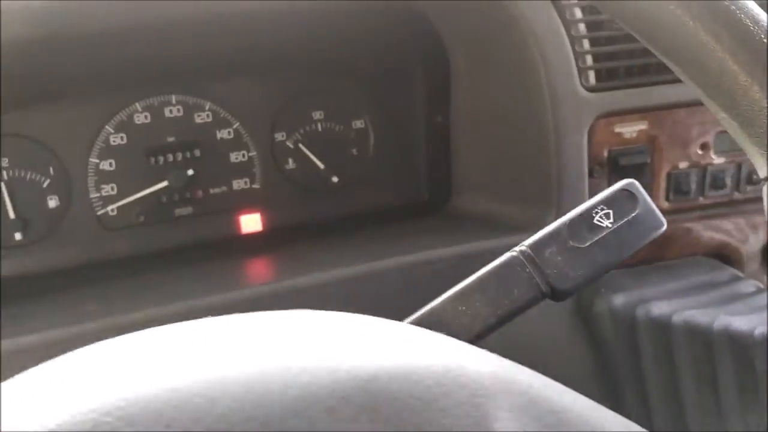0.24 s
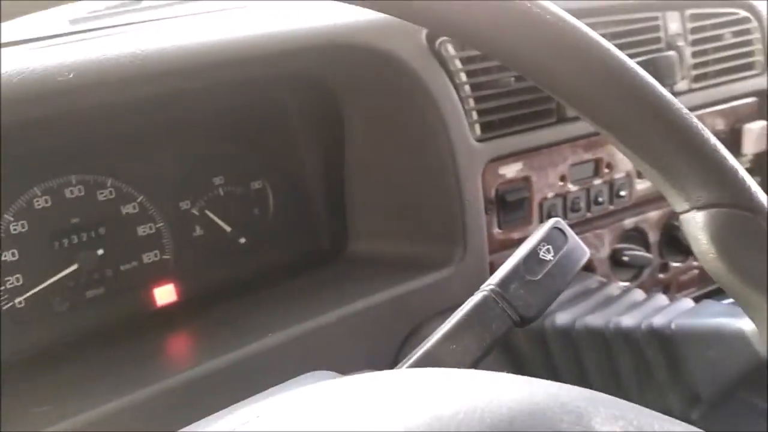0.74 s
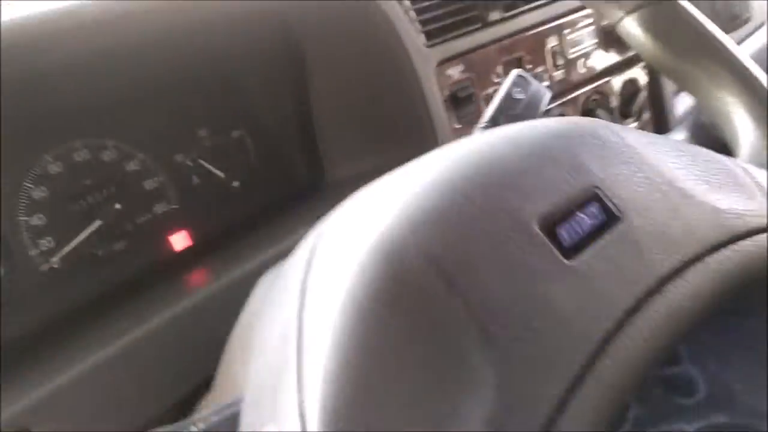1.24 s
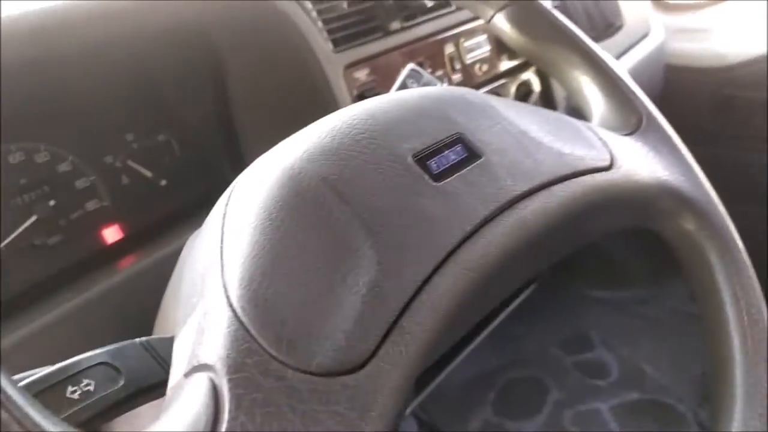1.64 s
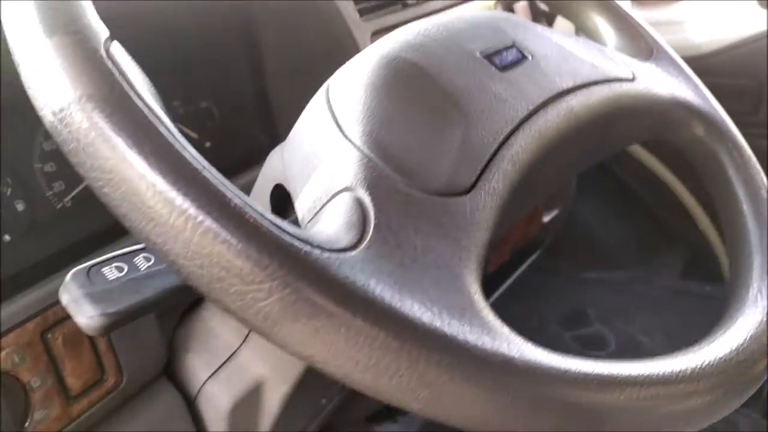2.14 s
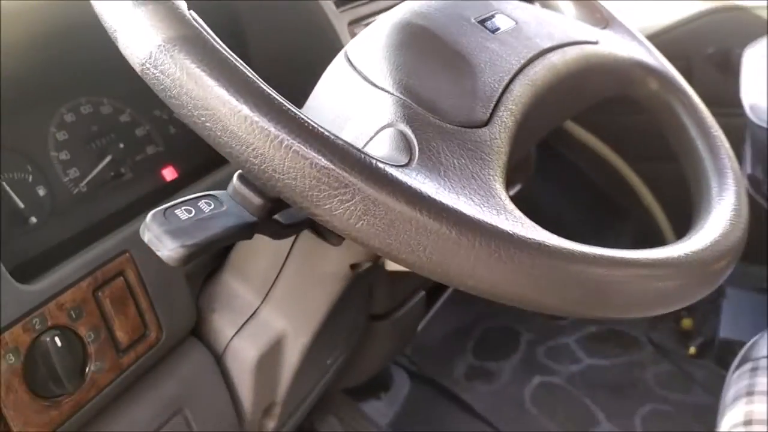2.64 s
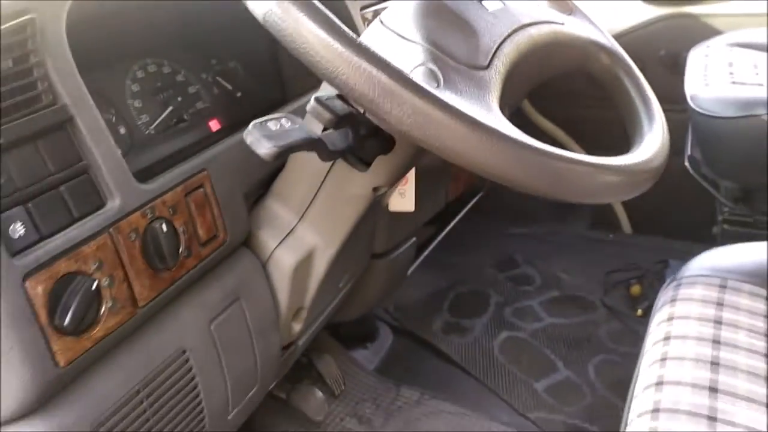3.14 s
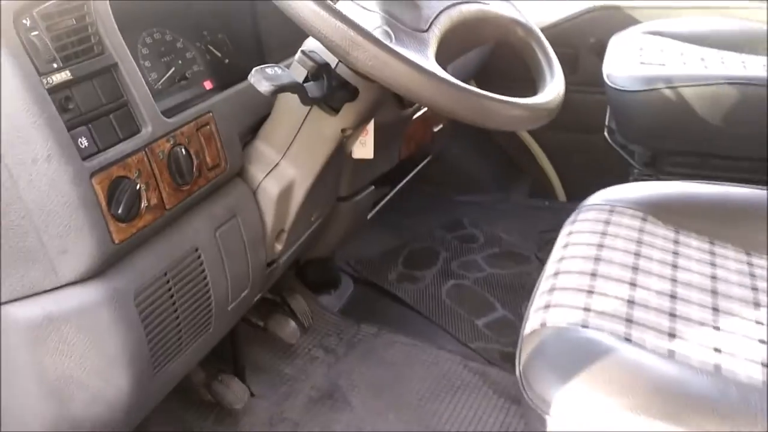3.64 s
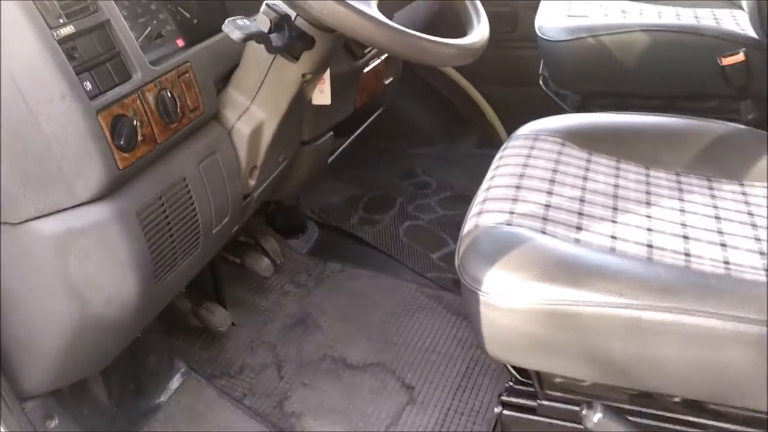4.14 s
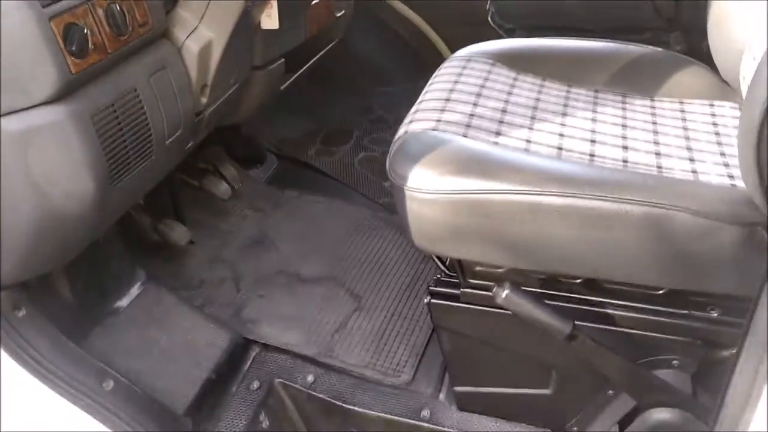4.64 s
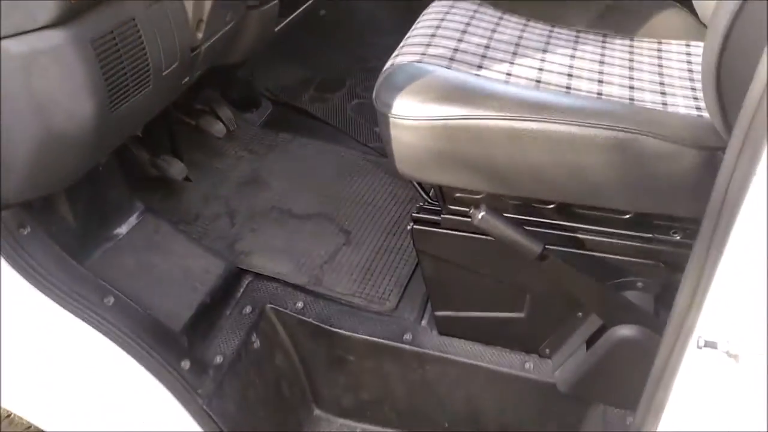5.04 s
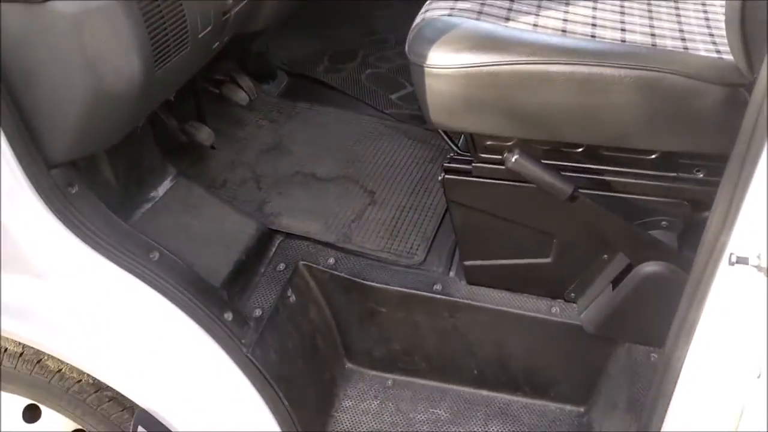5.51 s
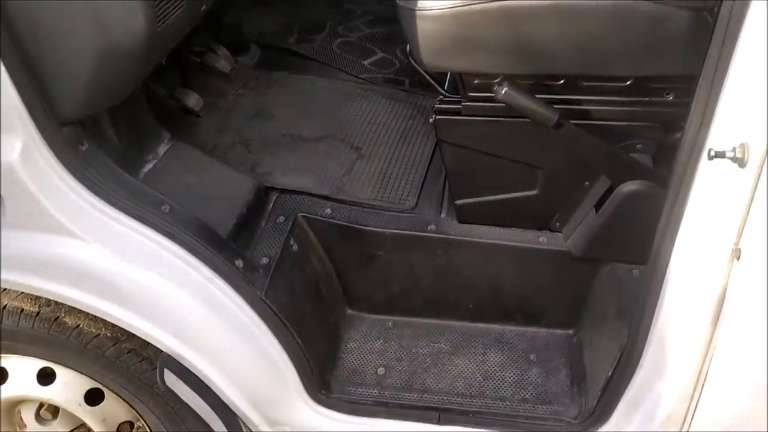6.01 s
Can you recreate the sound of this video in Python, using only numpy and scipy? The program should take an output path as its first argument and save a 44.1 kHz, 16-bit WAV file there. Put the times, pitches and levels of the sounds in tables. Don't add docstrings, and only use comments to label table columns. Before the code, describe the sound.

Low, clattery diesel idle heard from inside a cab towards the open door, with an early snap, soft bumps, a latch knock and rustling.

```python
import sys
import numpy as np
from scipy import signal
from scipy.fft import rfft, irfft, next_fast_len
from scipy.io import wavfile
from scipy.ndimage import uniform_filter1d, map_coordinates

SR = 44100
rng = np.random.default_rng(int(sys.argv[2]) if len(sys.argv) > 2 else 0)


def store_wav(level_fs):
    pcm = np.round(np.clip(np.atleast_2d(level_fs), -1, 1) * 32767)
    wavfile.write(sys.argv[1], SR, pcm.T.astype(np.int16))


def linear_from_db(decibels):
    return 10 ** (np.asarray(decibels, float) / 20)


N = 276507

# start_s [s], turned [engine cycles]
CRANK_TURNS = [(-.052, 0), (1.911, 11), (2.267, 13), (3.339, 19), (4.049, 23), (4.764, 27), (6.3716, 36)]


def unit(x):
    return x / np.sqrt(np.mean(x ** 2) + 1e-20)


def along(points, hz):
    f, v = np.transpose(points)
    return np.interp(np.log(hz + 1), np.log(f + 1), v)


def curves(rows):
    s, *cols = np.transpose(rows)
    return [np.interp(np.arange(N) / SR, s, c) for c in cols]


def wobble(rate):
    knots = rng.standard_normal(int(N * rate / SR) + 4)
    return map_coordinates(knots, [np.arange(N) * rate / SR])


def filtered(x, response):
    m = next_fast_len(N + SR // 2)
    return irfft(rfft(x, m) * response(np.fft.rfftfreq(m, 1 / SR)), m)[..., :N]


def colored(x, points):
    return unit(filtered(x, lambda f: linear_from_db(along(points, f))))


def resonant(peaks):
    def response(f):
        total = 0
        for k, (hz, width, db) in enumerate(peaks):
            damping = 1j * f * width
            total = total + (-1) ** k * linear_from_db(db) * damping / (hz * hz - f * f + damping)
        return total
    return response


def heard(levels):
    # start_s [s], place [0 dash, 1 footwell, 2 sill, 3 outside]
    path = [(0, 0.5), (1.0, 0.08), (1.5, 0.7), (2.1, 1.33), (2.8, 1.5), (3.5, 1.77), (4.2, 1.46), (4.8, 2),
            (5.4, 2.5), (5.8, 2.5), (6.27, 6)]
    return np.interp(curves(path)[0], range(4), levels)


def patchy(depth_db):
    z = signal.stft(rng.standard_normal((2, N)), nperseg=512)[2]
    field = uniform_filter1d(rng.standard_normal(z.shape[1:]), size=5, axis=0)
    field = uniform_filter1d(field, size=5, axis=1)
    return signal.istft(z * linear_from_db(depth_db * unit(field)), nperseg=512)[1][:, :N]


def cyclic(fresh, at, cylinder):
    # pitch_hz [Hz], share [power ratio]
    returning = [(100, .75), (700, .7), (1500, .45), (3000, .15), (6000, 0)]
    last = np.clip(np.searchsorted(at, np.arange(N), side="right") - 1, 0, None)
    since = abs(np.arange(N) - at[last])
    habit = rng.standard_normal((2, 2, 4, SR // 10))[..., cylinder[last], since]
    turn = heard((0, .5, 1.1, 1.6))
    same = np.cos(turn) * habit[0] + np.sin(turn) * habit[1]

    def shares(f):
        share = along(returning, f)
        return np.sqrt(np.array([share, 1 - share]))[:, None]
    return filtered(np.array([same, unit(fresh)]), shares).sum(axis=0)


def boom(cycles):
    even_leads = [(2, 3.6), (3, 1.5), (4, 1.2)]
    even_levels = [(-49.5, -44.5, -51, -51), (-47, -41.5, -53, -51), (-63, -58.5, -51.5, -51.5)]
    # cycle_order [1], level_db [dB], lead [rad], dash_gain_db [dB]
    uneven = [(7, -62, 2.1, 5), (9, -66, -2, 8), (10, -66, -1.8, 10), (11, -70, -1.2, 3), (13, -70, -2, 4),
              (15, -71, -1.8, 5), (17, -72, 1.4, 0), (20, -66, .2, 0), (25, -66, -2, -5)]
    angle, by_dash = 2 * np.pi * cycles, heard((1, 0, 0, 0))
    total = np.zeros(N)
    for levels, (k, lead) in zip(even_levels, even_leads):
        total += linear_from_db(heard(levels) + .8 * wobble(6)) * np.cos(4 * k * angle + lead)
    for k, db, lead, gain_db in uneven:
        total += linear_from_db(db + gain_db * by_dash + 1.9 * wobble(3.0)) * np.cos(k * angle + lead)
    x = np.sqrt(2) * total
    return np.array([x, x * .35])


def block_clatter(fire, burn, at, cylinder):
    # pitch_hz [Hz], width_hz [Hz], level_db [dB]
    block = [(766, 90, -6), (1010, 190, -4.5), (1550, 490, -2.5), (2080, 660, -6.5), (2710, 650, -10.5),
             (4800, 320, -24)]
    level_db = (-71, -59, -56.5, -57.5)
    roar = (unit(burn) + .12) * cyclic(rng.standard_normal((2, N)), at, cylinder)
    blows = .25 * unit(fire) * [[1], [.3]]
    return linear_from_db(heard(level_db) + 1.0) * unit(filtered(roar + blows, resonant(block)))


def sump_ring(blow, cycles):
    # pitch_hz [Hz], width_hz [Hz], level_db [dB]
    inner_rings = [(750, 55, 0), (650, 55, 0)]
    # pitch_hz [Hz], width_hz [Hz], level_db [dB]
    outer_rings = [(692, 52, 0), (1010, 110, -5), (1550, 150, -7), (2000, 150, -6)]
    level_db = (-71.5, -66, -63, -56.5)
    first = (cycles % 1 > .96) | (cycles % 1 < .2)
    each = lambda f: np.array([resonant([ring])(f) ** 2 for ring in inner_rings])
    inner = unit(filtered(blow * [first, ~first], each).sum(axis=0))
    outer = unit(filtered(np.roll(blow, 40), lambda f: resonant(outer_rings)(f) ** 2))
    outside = np.clip(heard((0.05, .3, .75, .8)), 0, 1)
    ring = np.sqrt(1 - outside) * inner + np.sqrt(outside) * outer
    return linear_from_db(heard(level_db) + 2.5) * ring * [[1], [.4]]


def panel_thump(push):
    # pitch_hz [Hz], width_hz [Hz], level_db [dB]
    panels = [(133.5, 22, -4.5), (198, 34, -1.5), (238, 36, -.6), (310.6, 31.5, -6)]
    level_db = (-60, -57.5, -59.5, -60)
    spread = lambda f: np.exp(-1j * np.pi * .00025 * (f - 228) ** 2)
    thump = unit(filtered(push, lambda f: resonant(panels)(f) ** 2 * spread(f)))
    return linear_from_db(heard(level_db)) * thump * [[1], [.4]]


def valve_gear(seating):
    # pitch_hz [Hz], width_hz [Hz], level_db [dB]
    gear = [(3530, 500, 0.5), (4460, 550, 3.5)]
    level_db = (-91, -98, -60, -63)
    t = np.arange(SR // 10) / SR
    dying = signal.fftconvolve(seating, linear_from_db(-60 * t / 0.11))[:N]
    chatter = dying * rng.standard_normal((2, N))
    return linear_from_db(heard(level_db)) * unit(filtered(chatter, resonant(gear)))


def engine_rattle(churn, burn):
    # pitch_hz [Hz], level_db [dB per Hz]
    rattle_color = [(180, -14), (300, -9), (425, -11), (633, -2.5), (825, -7), (1520, -8), (2310, -14.5),
                    (11200, -27.5), (14800, -32), (15800, -48)]
    level_db = (-63.5, -65.5, -60.5, -61.5)
    return linear_from_db(heard(level_db) + 9.0) * colored((1 + 0.58 * unit(burn)) * churn, rattle_color)


def engine_rumble(churn):
    # pitch_hz [Hz], level_db [dB per Hz]
    rumble_color = [(20, -32), (40, -8), (80, -5.5), (125, 0), (200, -8.5), (300, -6.5), (380, -27),
                    (900, -48.5)]
    level_db = (-50.5, -59.5, -54.5, -56)
    return linear_from_db(heard(level_db) - 1.5) * colored(churn, rumble_color)


def dash_hollow(churn):
    # pitch_hz [Hz], width_hz [Hz], level_db [dB]
    air = [(439, 155, .1)]
    level_db = (-69.5, -64.5, -79.5, -86)
    return linear_from_db(heard(level_db)) * unit(filtered(churn, lambda f: resonant(air)(f) ** 2))


def engine(cycles):
    # clatter_db, sump_ring_db, panel_push_db, valve_tick_db [dB]
    cylinders = [(0, 0, -11, -4), (1, -2, -9, 0), (-1, -6, 0, -1), (-3, -7, -11, -9)]
    s, turned = np.transpose(CRANK_TURNS)
    number = np.arange(2, 142)
    cylinder = number % 4
    clatter_db, sump_db, push_db, tick_db = np.array(cylinders)[cylinder].T
    chance = rng.standard_normal((len(number), 5))
    fire_s = np.interp(number / 4, turned, s) - .0025 + .00015 * chance[:, 0]
    at = (fire_s * SR).astype(int)
    slap = at + round(0.00918 * SR)

    fire, blow, push, seating = np.zeros((4, N))
    fire[at] = linear_from_db(clatter_db + .8 * chance[:, 1])
    fire[slap] = linear_from_db(clatter_db - 3 + 1.5 * chance[:, 2])
    blow[at - 40] = linear_from_db(sump_db + 1.1 * chance[:, 3])
    blow[slap - 40] = linear_from_db(sump_db - 9 + 2 * chance[:, 2])
    push_gain_db = (cylinder == 1) * heard((0, 0, 6, 8))[at]
    push[at - round(.004 * SR)] = linear_from_db(push_db + push_gain_db + 1.1 * chance[:, 4])
    seating[at] = linear_from_db(tick_db + chance[:, 3])
    seating[slap] = linear_from_db(tick_db - 1 + chance[:, 4])

    t = np.arange(SR // 10) / SR
    burn = signal.fftconvolve(fire, linear_from_db(-60 * t / .075) * (1 - np.exp(-t / .0005)))[:N]
    churn = cyclic(patchy(depth_db=3.0), at, cylinder)
    knocks = block_clatter(fire, burn, at, cylinder) + sump_ring(blow, cycles) + panel_thump(push)
    between = engine_rattle(churn, burn) + engine_rumble(churn) + dash_hollow(churn)
    return knocks + valve_gear(seating) + between


def struck(blows, body, blow_share, attack_s):
    force, t = np.zeros(N + SR), np.arange(SR // 3) / SR
    for s, db, t60 in blows:
        scrape = linear_from_db(-60 * t / abs(t60)) * (1 - np.exp(-t / attack_s)) * rng.standard_normal(len(t))
        scrape[0] = blow_share
        force[round(s * SR):][:len(t)] += linear_from_db(db + 15.5) * scrape
    return filtered(force[:N], resonant(body))


def cab(x, wet_db, scatter_db):
    # pitch_hz [Hz], t60_s [s]
    decay = [(150, 0.22), (1000, 0.11), (8000, 0.011)]
    hz, t, z = signal.stft(rng.standard_normal((2, SR // 3)), SR, nperseg=256)
    t60 = abs(along(decay, hz))[:, None]
    tail = signal.istft(z * linear_from_db(-60 * t / t60) / np.sqrt(t60), SR, nperseg=256)[1]
    wet = signal.fftconvolve(x[None], tail / np.linalg.norm(tail[0]), axes=1)[:, :N]
    return np.array([x + linear_from_db(wet_db) * wet[0], linear_from_db(scatter_db) * wet[1]])


def lever_snap():
    # start_s [s], level_db [dB], scrape_t60_s [s]
    contacts = [
        (.1762, -18, 0.035),
        (.1805, -23.5, 0.055),
        (.187, -32.5, 0.036),
        (.194, -38, 0.036),
        (.2015, -46.5, 0.12),
    ]
    # pitch_hz [Hz], width_hz [Hz], level_db [dB]
    body = [(135, 40, -1), (266, 62, 2), (374, 84, 3), (566, 90, -2), (766, 120, -3.5), (1070, 120, -5),
            (1420, 360, -7.5), (1860, 330, 0.5), (2300, 420, -4.5), (2820, 230, -5), (3510, 340, -6),
            (5400, 1800, -13.5), (8500, 330, -10.5), (10540, 930, -13.5)]
    return cab(struck(contacts, body, blow_share=5.4, attack_s=0.000094), wet_db=-2.0, scatter_db=3.4)


def latch_knock():
    # start_s [s], level_db [dB], scrape_t60_s [s]
    contacts = [
        (1.9112, -25.5, 0.034),
        (1.9135, -25.5, 0.048),
        (1.919, -32.5, 0.043),
        (1.93, -36, 0.04),
        (1.95, -42.5, 0.055),
    ]
    # pitch_hz [Hz], width_hz [Hz], level_db [dB]
    body = [(149, 34, 2), (307, 30, 3.5), (385, 15, 5), (520, 60, -4.5), (633, 80, -6.5), (910, 250, -11.5),
            (1620, 710, -10), (2220, 370, -5.5), (4700, 380, -15.5), (8250, 3200, -25)]
    return cab(struck(contacts, body, blow_share=15.4, attack_s=0.0002), wet_db=-5, scatter_db=0.5)


def bolt_thud():
    # start_s [s], level_db [dB], pitch_hz [Hz], length_s [s]
    bolt = (1.9111, -15, 470, .0046)
    s, db, hz, length = bolt
    t = np.clip(np.arange(N) / SR - s, 0, length)
    swell = np.sin(np.pi * t / length) ** 2
    return -linear_from_db(db) * np.sin(2 * np.pi * hz * t) * swell * [[1], [.45]]


def seat_bumps():
    # start_s [s], level_db [dB], scrape_t60_s [s]
    bumps = [(.178, -37, 0.19), (.303, -29, 0.042), (.32, -58, 0.12), (.36, -41.5, 0.18),
             (.40, -41.5, 0.27), (.435, -41, 0.17), (.62, -40, 0.067), (1.22, -43.5, .2),
             (1.295, -38, 0.33), (1.333, -25.5, 0.11), (1.35, -51, .1)]
    # pitch_hz [Hz], width_hz [Hz], level_db [dB]
    body = [(103, 16, 3), (152, 21, 8.5), (205, 36, 0), (270, 63, -2), (420, 157, -4), (660, 380, -12.5),
            (1800, 790, -33)]
    return cab(struck(bumps, body, blow_share=11.3, attack_s=0.0056), wet_db=-5.5, scatter_db=3.0)


def ticks():
    # start_s [s], peak_db [dB], pitch_hz [Hz], t60_s [s], left_right_db [dB]
    cracks = [(0.3035, -42, 10100, 0.096, 14), (0.365, -29.5, 8050, 0.036, 15),
              (0.7866, -39, 10100, 0.05, 7), (1.113, -41, 5910, 0.064, -4), (1.4113, -38, 8610, 0.059, 4),
              (1.4444, -45, 9800, 0.046, 2.0), (2.0403, -38, 9290, 0.11, 13), (2.844, -61, 4810, 0.05, 2.5),
              (3.7, -31.5, 4260, 0.047, -8), (3.7183, -34, 5690, 0.042, -4), (3.756, -56, 8060, 0.05, -2),
              (4.2701, -46, 6660, 0.05, 9), (4.673, -40, 4490, 0.055, 6), (4.778, -31, 3900, 0.032, 4),
              (4.953, -46, 4620, 0.045, 0), (5.7752, -38.5, 9710, 0.05, 0)]
    out, t = np.zeros((2, N + SR)), np.arange(SR // 10) / SR
    f = np.fft.rfftfreq(len(t), 1 / SR)
    bright = f / 3000 / (1 + f / 3000)
    for s, db, hz, t60, pan_db in cracks:
        peak = 1 / (1 + ((f - hz) / 3500) ** 2)
        crack = unit(irfft(rfft(rng.standard_normal(len(t))) * bright * peak))
        pan = np.array([[pan_db / 2], [-pan_db / 2]])
        out[:, round(s * SR):][:, :len(t)] += linear_from_db(db - 14.5 - 60 * t / abs(t60) + pan) * crack
    return out[:, :N]


def strokes():
    # peak_s [s], level_db [dB], rise_s [s], fall_s [s], coarse_db [dB]
    rubs = [(.022, -63, 0.027, .05, -9), (.15, -60.5, 0.062, 0.045, -17), (.304, -57.5, 0.0069, 0.02, 7.5),
            (.366, -46.5, 0.0037, 0.011, -5.5), (.482, -59.5, 0.14, 0.049, -17), (.7, -58, 0.2, 0.13, -1),
            (.81, -56, 0.092, 0.32, -5.5), (1.24, -61, 0.066, 0.041, -4), (1.35, -52, 0.098, 0.03, 1.5),
            (1.418, -54, .04, .06, -9), (1.628, -63, 0.062, .03, 1), (2.07, -47.5, 0.018, 0.026, -11),
            (2.45, -66, 0.71, 0.13, -5), (2.72, -62, 0.054, 0.032, -1), (2.85, -63.5, .012, 0.49, -6),
            (3.38, -59, 0.01, 0.025, -1), (3.73, -54, 0.11, .16, -5.5), (4.41, -59, 0.16, 0.13, -0.5),
            (4.78, -57.5, 0.065, 0.051, 2.5), (4.95, -61, .05, 0.12, 2.5), (5.27, -56.5, 0.069, 0.0078, -2),
            (5.32, -60, 0.014, 0.27, -9), (5.79, -66.5, 0.49, 0.9, 4), (6.25, -60, 0.024, 0.0098, -2)]
    slope_db, still_db = 10, -78
    s, db, rise, fall, coarse_db = np.transpose(rubs)[:, :, None]
    late = np.arange(0, N, 64) / SR - s
    swell = linear_from_db(db - slope_db * np.maximum(-late / abs(rise), late / abs(fall)))
    power = [(swell ** 2).sum(0), ((swell * linear_from_db(coarse_db)) ** 2).sum(0)]
    return np.sqrt(np.repeat(power, 64, axis=1)[:, :N] + linear_from_db(still_db) ** 2)


def rustle():
    # pitch_hz [Hz], level_db [dB per Hz]
    cloth = [(3000, -20.5), (5000, -8.5), (8000, -1.5), (11000, -7), (14000, -15.5), (16000, -2.5)]
    # pitch_hz [Hz], level_db [dB per Hz]
    grit = [(700, -39), (1500, 4), (3000, -3.5), (5000, -7), (7500, -18)]
    size_db = np.minimum(3 * rng.exponential(size=(2, N)), 11)
    spikes = (rng.random((2, N)) < .03) * linear_from_db(size_db)
    x = unit(spikes * rng.standard_normal((2, N))) * .6 + patchy(depth_db=4.0)
    fine_gain, coarse_gain = strokes()
    rub = fine_gain * colored(x, cloth) + coarse_gain * colored(x, grit)
    return linear_from_db(1.4 * wobble(40) + 2.25) * rub


def shudder():
    # pitch_hz [Hz], level_db [dB per Hz]
    shudder_color = [(15, -28), (28, -11), (40, -9), (60, 17), (110, 5), (200, -61)]
    level_db = (-44, -61, -78, -66)
    lumps = linear_from_db(3.0 * wobble(21)) * rng.standard_normal((2, N))
    return linear_from_db(heard(level_db)) * colored(lumps, shudder_color)


def ports(pair, lead_s=0.000297, corner_hz=800):
    # pitch_hz [Hz], likeness [0..1]
    alike = [(60, 0.98), (300, 0.81), (700, 0.55), (2000, 0.094), (8000, 0.043)]
    # pitch_hz [Hz], left_right_db [dB]
    balance = [(60, 1), (110, 3.5), (200, 1), (380, 1.5), (700, 1.5), (1290, -4), (2380, -1), (4400, 1.5),
               (8120, 1), (15000, 5)]

    def blend(f):
        turn = np.arccos(np.clip(along(alike, f), 0, 1)) / 2
        return np.array([np.cos(turn), np.sin(turn)])

    def offset(f):
        lead = np.exp(1j * np.pi * f * lead_s * f ** 2 / (f ** 2 + corner_hz ** 2))
        half = linear_from_db(along(balance, f) / 2) * lead
        return np.array([half, 1 / half])
    mid, side = filtered(pair, blend)
    return filtered(np.array([mid + side, mid - side]), offset)


def scene():
    cycles = curves(CRANK_TURNS)[0]
    machine = boom(cycles) + engine(cycles)
    hands = lever_snap() + latch_knock() + bolt_thud() + seat_bumps()
    return ports(machine + hands + rustle() + shudder()) + ticks()


def band_limit(x):
    return signal.sosfilt(signal.butter(12, 16470, fs=SR, output="sos"), x)


def record(dry):
    def band(f):
        bass = (f / 26) ** 3 / (1 + (f / 26) ** 3)
        return bass / (1 + (f / 15400) ** 16) * (f < 15820)
    return band_limit(filtered(dry, band))


dry = scene()
out = record(dry)
store_wav(out)
```